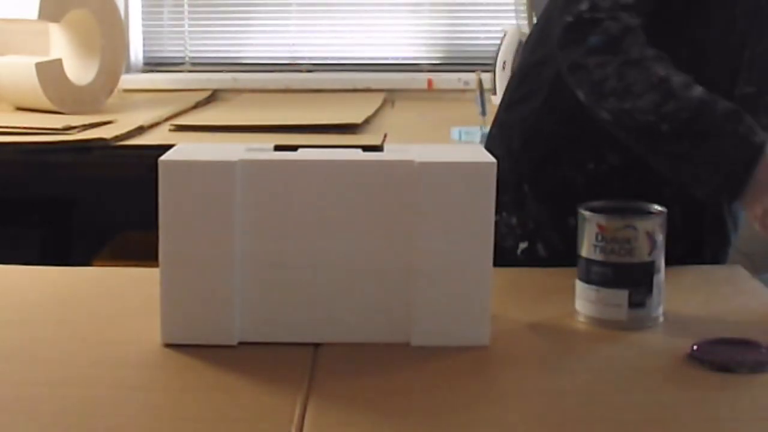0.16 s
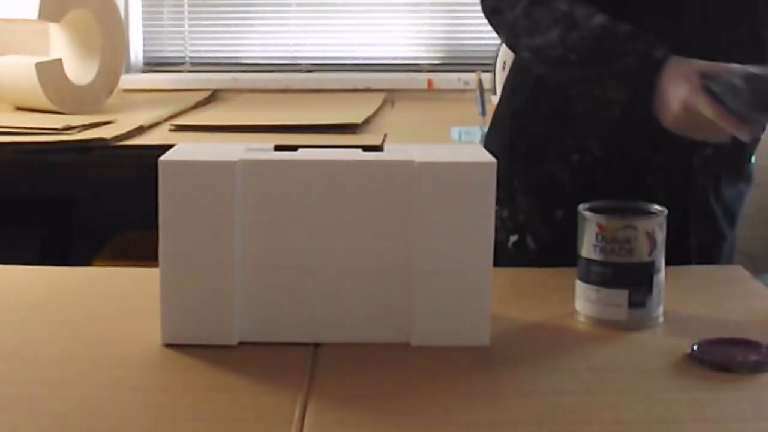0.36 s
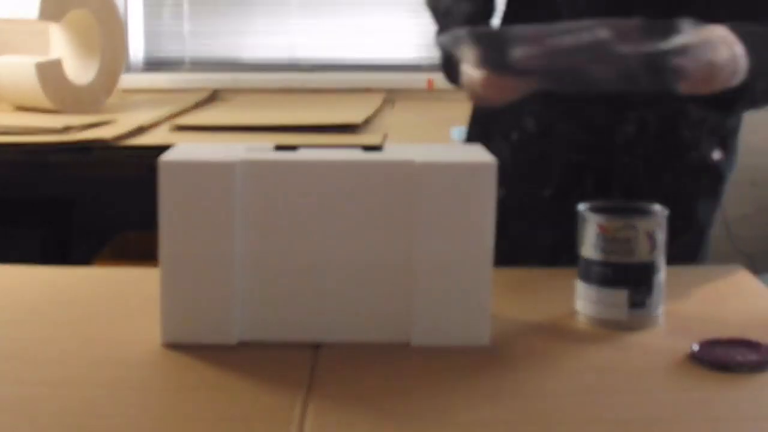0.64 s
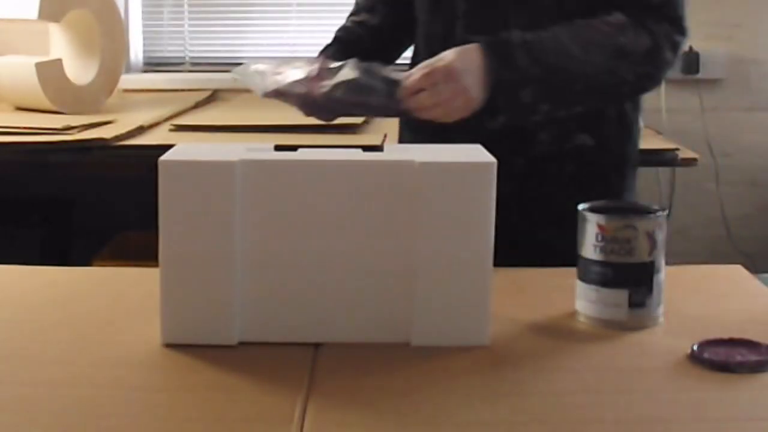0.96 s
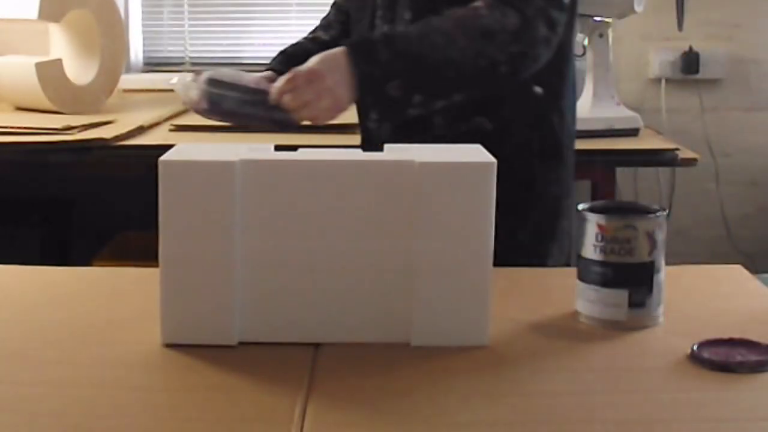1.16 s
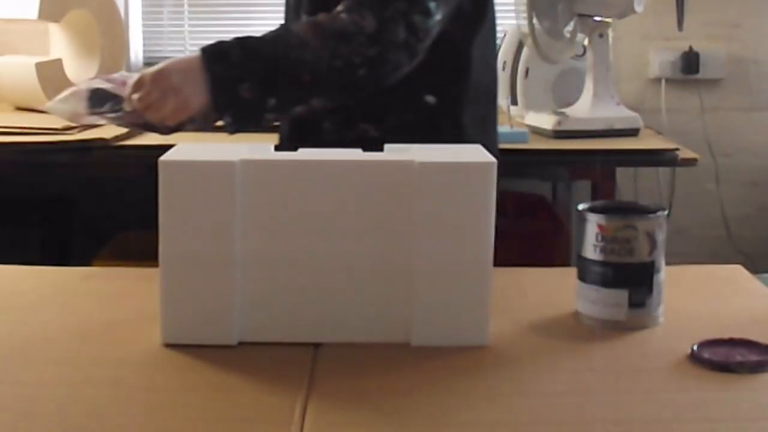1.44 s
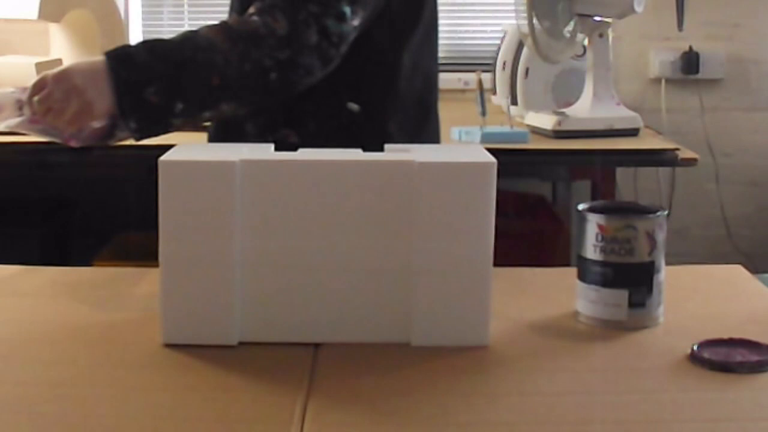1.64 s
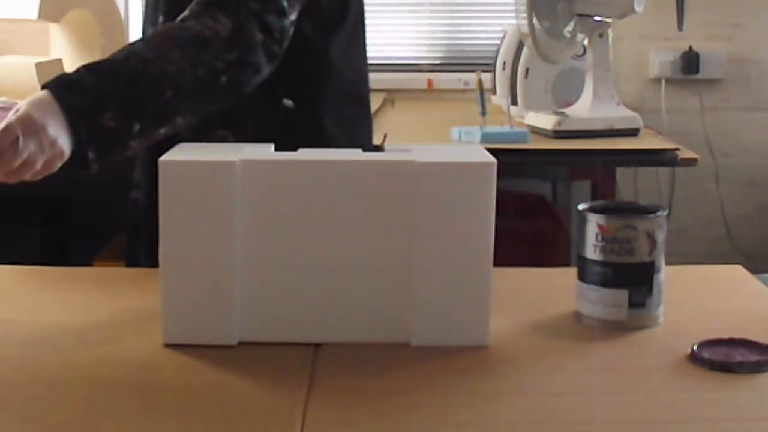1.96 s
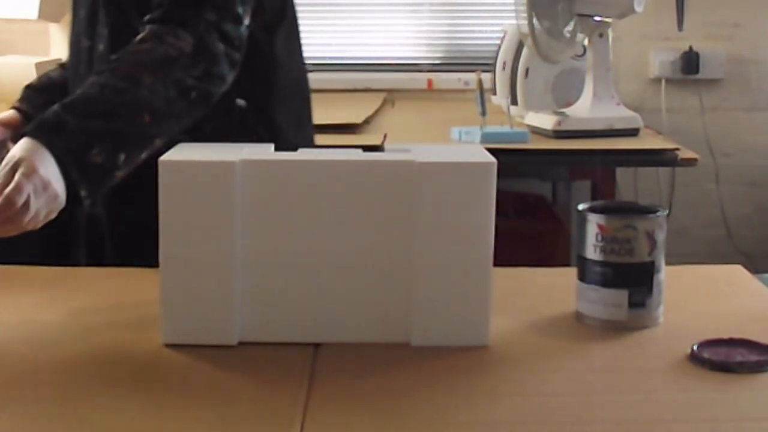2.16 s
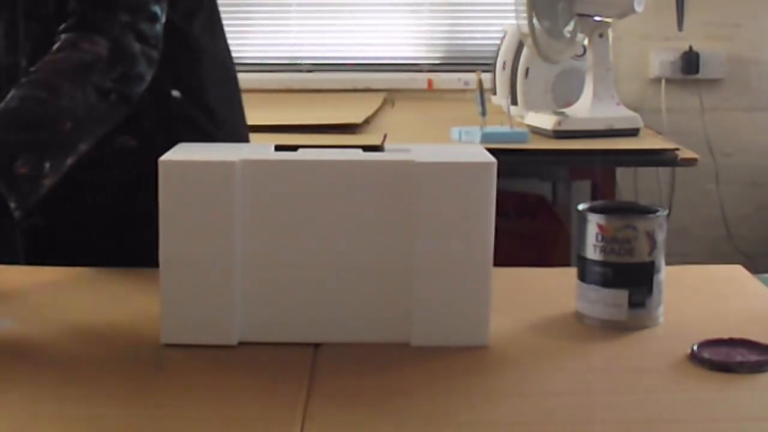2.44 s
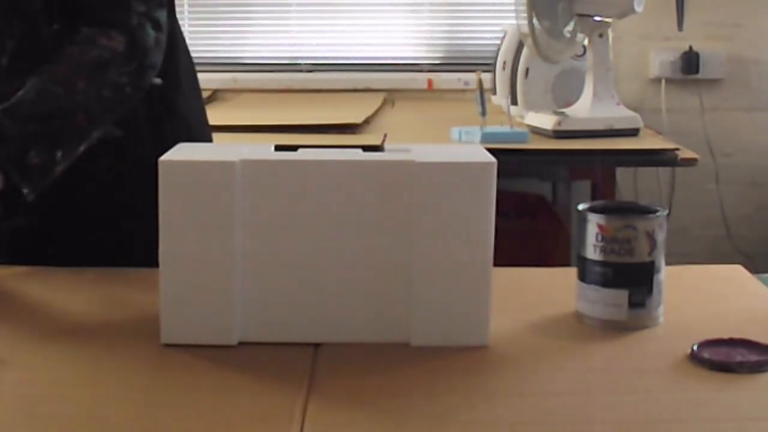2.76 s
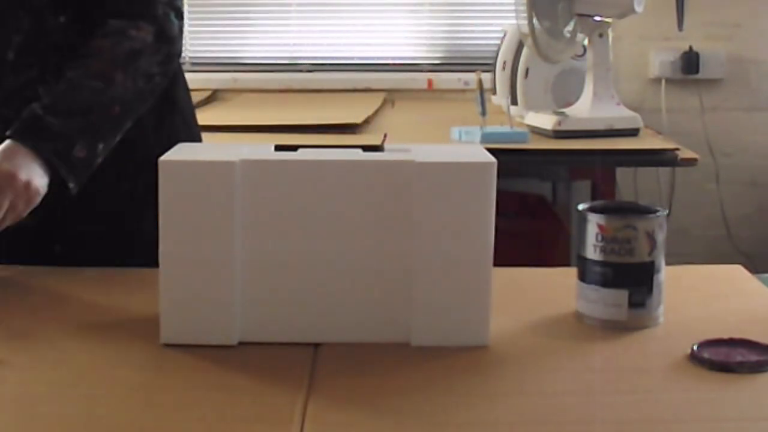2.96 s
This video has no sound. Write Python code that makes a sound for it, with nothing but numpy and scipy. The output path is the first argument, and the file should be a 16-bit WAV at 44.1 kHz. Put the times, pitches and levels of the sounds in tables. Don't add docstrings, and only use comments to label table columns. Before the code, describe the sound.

Thin plastic sleeve being squeezed and moved, popping sharply over a faint low room rumble

```python
import sys
import numpy as np
from scipy import signal
from scipy.fft import rfft, irfft
from scipy.io import wavfile
from scipy.ndimage import uniform_filter1d

SR = 44100
rng = np.random.default_rng(int(sys.argv[2]) if len(sys.argv) > 2 else 0)


def generate_wav(signal):
    frames = np.transpose(np.atleast_2d(signal))
    scaled = np.clip(frames, -1, 1) * 32767
    pcm = np.round(scaled).astype(np.int16)
    wavfile.write(sys.argv[1], SR, pcm)


def to_linear_factor(level_db):
    exponent = np.asarray(level_db, float) / 20
    return 10 ** exponent


N = 136710
T = np.arange(N) / SR

# pitch_hz [Hz], density_db [dB per Hz]
WASH_COLOUR = [(35, -41), (60, -4), (156, -2.5), (1230, -10.5), (3340, -6.5), (5320, -29.5), (10200, -49),
               (13500, -35), (15500, -76)]
# centre_s [s], length_s [s], peak_db [dB]
HEAVES = [(.83, 0.034, -27.5), (.872, 0.042, -19), (.905, 0.04, -28), (.985, 0.038, -23.5),
          (1.1, 0.042, -29.5), (1.445, 0.041, -23.5), (1.49, 0.053, -28), (1.65, 0.045, -28.5),
          (2.015, 0.036, -31), (2.115, 0.059, -28), (2.16, 0.06, -29), (2.26, 0.04, -27.5)]
# time_s [s], crackle_db [dB], treble_tilt_db [dB]
EFFORT = [(0, -58, 16.5), (.195, -54, 2), (0.225, -35, 1), (.64, -30.5, -3), (.71, -40.5, 3.5),
          (.81, -45.5, 3), (.9, -36.5, -4.5), (.935, -23.5, 1.5), (1.1, -28, 0), (1.3, -29, 2),
          (1.35, -31, -0.5), (1.42, -25.5, 1), (1.688, -25, 2), (1.77, -46.5, 0), (2.26, -46, 3),
          (2.42, -38, -1.5), (2.56, -43, 3), (2.8, -37.5, -0.5)]
# centre_s [s], length_s [s], gain_db [dB], body_db [dB]
SQUEEZES = [(0.264, 0.11, 7.5, 2), (0.436, 0.043, 3.5, 5.5), (0.538, 0.066, 4.5, -0.5),
            (0.764, 0.031, 9.5, -7), (0.878, 0.029, 12, -4), (0.959, 0.014, -0.5, 2.5),
            (0.988, 0.038, -7.5, -8), (1.092, .04, -3, 1.5), (1.155, 0.02, 8.5, -1), (1.231, 0.076, 10, 3),
            (1.398, 0.064, 5, 3.5), (1.461, 0.041, 4, -2.5), (1.62, 0.28, 1, 3.5), (1.627, 0.082, 1, -2.5),
            (1.834, 0.052, 13, -20), (1.909, 0.077, 13, 3), (2.195, 0.014, 15.5, 9),
            (2.311, 0.0056, 14, 4.5), (2.348, 0.034, 11, -1), (2.607, 0.016, -7, 8), (2.463, 0.057, 13, 3),
            (2.872, 0.1, 10.5, 0.5), (2.961, 0.012, 10, -12), (3.055, 0.0077, -0.5, 13.5)]
# pitch_hz [Hz], density_db [dB per Hz]
FILM_COLOUR = [(210, -39), (350, -12), (878, -8.5), (1210, -12.5), (1740, -6), (3550, -1), (5800, -14.5),
               (10400, -26), (13500, -37)]
# start_s [s], peak_db [dB], pitch_hz [Hz], treble_db [dB]
SNAPS = [(0.0181, -26.5, 3400, -23), (0.0928, -30, 2880, -20), (0.2036, -30, 2830, -20),
         (0.2219, -31, 3200, -28), (0.3033, -15, 3700, -20), (0.524, -16.5, 3470, -17.5),
         (0.5927, -18.5, 2570, -16), (0.6507, -16.5, 2630, -23), (0.8671, -24.5, 3140, -23),
         (0.9211, -13.5, 2680, -14), (1.0142, -17, 2600, -15), (1.0929, -13, 4050, -18),
         (1.1318, -13.5, 3500, -5), (1.715, -17.5, 3120, -45), (1.8099, -17.5, 3270, -14.5),
         (1.8531, -13, 3580, -16), (1.8912, -18, 3100, -41), (1.985, -25.5, 3060, -11),
         (2.047, -29.5, 3800, -13), (2.0717, -19.5, 3370, -9.5), (2.19, -21, 3230, -13.5),
         (2.2938, -15, 2560, -25), (2.3092, -9.5, 3320, -21), (2.4025, -15, 2770, -19),
         (2.6049, -20.5, 2980, -15), (2.8423, -12.5, 2600, -11), (3.0006, -22, 3670, -10),
         (3.0703, -23, 3420, -12)]
# start_s [s], peak_db [dB], pitch_hz [Hz]
PRICKS = [(0.0209, -43.5, 5880), (0.0626, -42, 7650), (0.1087, -44, 5550), (0.2114, -42, 5780),
          (0.2219, -37, 5600), (0.2399, -24, 5930), (0.3511, -40, 7930), (0.372, -31, 5500),
          (0.377, -32, 6300), (0.5332, -23.5, 5940), (0.7472, -30, 5660), (0.9133, -24, 5660),
          (0.9358, -23, 5700), (0.992, -29, 5500), (1.0146, -26.5, 7020), (1.031, -32, 5500),
          (1.0434, -28, 5600), (1.067, -37, 7860), (1.0919, -38, 5770), (1.1297, -28, 7500),
          (1.2604, -33, 5500), (1.3563, -29, 5520), (1.5244, -27, 6510), (1.8028, -30, 5860),
          (1.9934, -33, 6840), (2.2662, -39, 5990), (2.2897, -29, 6290), (2.3284, -27, 6290),
          (2.4675, -33, 7200), (2.8325, -27, 7540), (2.8654, -26, 7350), (3.0415, -34, 7200)]
# centre_s [s], length_s [s], level_db [dB], pitch_hz [Hz]
GULPS = [(0.107, 0.029, -38, 305), (0.212, 0.029, -36.5, 306), (0.24, 0.027, -44, 305),
         (0.303, 0.022, -35.5, 297), (0.409, 0.038, -36, 302), (0.437, 0.024, -36.5, 282),
         (0.506, 0.024, -36.5, 297), (0.576, 0.025, -34, 297), (0.624, 0.044, -39, 295),
         (1.055, 0.017, -32, 296), (1.164, 0.026, -35.5, 292), (1.25, 0.052, -35, 293),
         (1.373, 0.061, -36.5, 286), (1.622, 0.026, -36.5, 284), (2.259, 0.015, -37, 272)]
# start_s [s], peak_db [dB], pitch_hz [Hz]
CREASES = [(0.2526, -18, 3450), (0.2644, -18, 3430), (0.352, -17, 3240), (0.377, -16.5, 3050),
           (0.3905, -19, 3070), (0.3985, -15, 3130), (0.418, -13.5, 3220), (0.4606, -10, 3130),
           (0.5305, -12, 3440), (0.8144, -31, 2940), (0.9349, -10, 3650), (0.9524, -22, 3280),
           (1.0308, -15, 2710), (1.058, -12.5, 3230), (1.0926, -18, 3480), (1.1721, -12, 3520),
           (1.2053, -11, 3280), (1.2264, -4, 3140), (1.2304, -16, 2900), (1.2502, -9, 3560),
           (1.3876, -11, 3430), (1.458, -9, 2920), (1.4627, -13.5, 3330), (1.511, -18, 3170),
           (1.5225, -12, 2780), (1.595, -14, 3120), (1.601, -17, 2770), (1.6187, -17, 3600),
           (1.674, -12, 3440), (1.7216, -12, 3180), (1.949, -23, 3380), (2.2702, -26, 2760),
           (2.3288, -18, 3320), (2.3471, -14.5, 3630), (2.3642, -15.5, 3400), (2.4564, -19, 3200),
           (2.4667, -12, 3220), (2.7292, -25, 3330), (2.8465, -12, 2720), (2.8845, -12, 3550),
           (2.8964, -13, 3600), (2.9626, -15.5, 3400)]
# centre_s [s], length_s [s], level_db [dB], top_hz [Hz]
SHOVES = [(0.747, 0.058, -40.5, 119), (1.252, 0.19, -40, 300), (1.433, 0.23, -43.5, 120),
          (1.384, 0.045, -34.5, 1010), (2.03, 0.036, -41.5, 255), (2.076, 0.14, -39.5, 89),
          (2.109, 0.04, -36, 378), (2.187, 0.15, -40, 596), (2.28, 0.068, -38.5, 407),
          (2.423, 0.12, -42.5, 147), (2.472, 0.022, -33.5, 1030)]
# start_s [s], length_s [s], level_db [dB], pitch_hz [Hz]
RINGS = [
    (1.37, .035, -36, 1780),
    (1.41, .07, -38, 1795),
    (1.375, .03, -43, 880),
]


def level(x, db):
    return x * to_linear_factor(db) / np.sqrt(np.mean(x ** 2))


def colour(x, points):
    point_hz, point_db = np.array(points, float).T
    hz = np.maximum(np.arange(1025) * SR / 2048, 1)
    gain_db = np.maximum(np.interp(np.log(hz), np.log(point_hz), point_db), -90)
    cepstrum = irfft(gain_db * np.log(10) / 20)
    cepstrum[1:1024] *= 2
    cepstrum[1025:] = 0
    impulse = irfft(np.exp(rfft(cepstrum)))
    return signal.fftconvolve(x, impulse)[:len(x)]


def band(x, hz, width_hz):
    return signal.lfilter(*signal.iirpeak(hz, hz / width_hz, SR), x)


def cut(x, hz, kind, order=2):
    return signal.sosfilt(signal.butter(order, hz, kind, fs=SR, output="sos"), x)


def walk(rate_hz):
    hold = int(SR / rate_hz)
    steps = np.repeat(rng.standard_normal(N // 20)[:N // hold + 1], hold)
    return 1.3 * uniform_filter1d(uniform_filter1d(steps, hold), hold)[:N]


def bump(centre_s, length_s):
    return np.cos(np.pi * np.clip((T - centre_s) / length_s, -0.5, 0.5)) ** 2


def floor_rumble():
    centre_hz = 28
    sway = band(band(rng.standard_normal(N), centre_hz, 6.8), centre_hz, 15)
    sway = cut(sway, 72, "low", order=3)
    return sway / np.sqrt(uniform_filter1d(sway ** 2, size=9000)) * to_linear_factor(-42.5)


def mains_hum():
    return np.sin(2 * np.pi * 101.7 * T) * to_linear_factor(-52.5 + 2.0 * walk(6.17))


def floor_heaves():
    heaves = 0
    for k, (centre_s, length_s, peak_db) in enumerate(HEAVES):
        heaves = heaves + (-1) ** k * to_linear_factor(peak_db) * bump(centre_s, 0.89 * length_s)
    return cut(heaves, 3.2, "high", order=1)


def shop_wash():
    wash = level(colour(rng.standard_normal(N), WASH_COLOUR), -43.5) * to_linear_factor(1.4 * walk(5.65))
    return wash + 0.57 * band(wash, 2890, 270) + 0.54 * band(wash, 1465, 167)


def pops(rate_hz, scatter_db):
    smear_s = 0.00074
    chance, size = rng.random((2, N))
    clicks = (chance < rate_hz / SR) * to_linear_factor(-2 * scatter_db * np.log(size + 0.01))
    power = signal.lfilter([1], [1, -np.exp(-2 / (smear_s * SR))], clicks)
    return level(np.sqrt(power) * rng.standard_normal(N), 0)


def crackle():
    pops_per_s = 3200
    time_s, crackle_db, tilt_db = np.array(EFFORT).T
    clusters_db = 1.2 * walk(59.65) + 0.98 * walk(24.34)
    squeeze_db = sum(gain_db * bump(c, 2 * w) for c, w, gain_db, _ in SQUEEZES)
    loudness_db = np.interp(T, time_s, crackle_db) + clusters_db + squeeze_db
    film = 0
    for hz in (1515, 2600, 4430, 7600):
        creases = pops(pops_per_s / 4, scatter_db=1)
        film = film + 0.56 * creases + band(creases, hz, hz * 0.27)
    film = colour(film, FILM_COLOUR)
    film = level(film + 0.82 * band(film, 3280, 540), -1.48) * to_linear_factor(loudness_db)
    treble_db = np.interp(T, time_s, tilt_db) + 1.4 * walk(45.27)
    return film + cut(film, 2650, "high") * (to_linear_factor(treble_db) - 1)


def snaps():
    n, decay_s, crack_s, rise_s = 4096, 0.005, 0.001, 0.0016
    out = np.zeros(N + n)
    train = pops(3600, scatter_db=1.2)
    fade = np.exp(-T[:n] / decay_s)
    for k, (start_s, peak_db, hz, treble_db) in enumerate(SNAPS):
        run = train[k * n:k * n + n] * fade
        run[:256] += 1.1 * rng.standard_normal(256) * np.exp(-T[:256] / crack_s)
        run *= 1 - np.exp(-T[:n] / rise_s)
        run = colour(0.5 * run + 1.66 * band(run, hz, 660), FILM_COLOUR)
        run = run + cut(run, 4800, "high") * (to_linear_factor(treble_db + 18.5) - 1)
        i = int((start_s - 0.001) * SR)
        out[i:i + n] += run / np.sqrt(np.mean(run[:256] ** 2)) * to_linear_factor(peak_db - 8.5)
    return out[:N]


def ticks(table, decay_s, width_share, trim_db):
    n, rise_s = 512, 0.00043
    out = np.zeros(N + n)
    fade = np.exp(-T[:n] / decay_s)
    rise = 1 - np.exp(-T[:n] / rise_s)
    for start_s, peak_db, hz in table:
        rasp = rng.standard_normal(n) * fade * rise
        rasp = band(band(rasp, hz, hz * width_share), hz, hz * 0.45)
        i = int(start_s * SR)
        out[i:i + n] += rasp / np.max(np.abs(rasp)) * to_linear_factor(peak_db + trim_db)
    return out[:N]


def edge_pricks():
    return ticks(PRICKS, decay_s=0.0021, width_share=0.45, trim_db=-0.5)


def tin_gulps():
    gulps = 0
    for centre_s, length_s, level_db, hz in GULPS:
        tone = np.sin(2 * np.pi * hz * (T - centre_s))
        gulps = gulps + to_linear_factor(level_db + 3.5) * bump(centre_s, length_s) ** 0.77 * tone
    return gulps


def sharp_creases():
    return ticks(CREASES, decay_s=0.0015, width_share=0.16, trim_db=-5.0)


def squeeze_body(film):
    body_db = sum(body * bump(c, 2 * w) for c, w, _, body in SQUEEZES)
    return film + cut(film, 2030, "low") * (to_linear_factor(body_db) - 1)


def shoves():
    out = 0
    for centre_s, length_s, level_db, top_hz in SHOVES:
        push = cut(cut(rng.standard_normal(N), top_hz, "low"), 28, "high")
        out = out + bump(centre_s, 1.83 * length_s) * level(push, level_db)
    return out


def tin_rings():
    flutter = band(rng.standard_normal(N), 43, 73) * 11 + 1.9
    rings = 0
    for start_s, length_s, level_db, hz in RINGS:
        tone = np.sin(2 * np.pi * hz * (T - start_s))
        rings = rings + to_linear_factor(level_db) * bump(start_s + length_s / 2, length_s) ** 0.13 * tone
    return rings * flutter


def room(x):
    t60_s = 0.4
    t = T[:SR // 2]

    def fall(time_s):
        return np.exp(-np.log(1000) * t / time_s) * np.minimum(t / 0.01, 1)

    out = 0
    for k in range(4):
        noise = rng.standard_normal(len(t))
        tail = cut(noise, 3900, "low") * fall(t60_s) + 1.34 * cut(noise, 6640, "high") * fall(t60_s * 0.63)
        share = np.maximum(np.cos(2 * np.pi * (3 * T - k / 4)), 0)
        out = out + signal.fftconvolve(x * share, tail / np.sqrt(np.sum(tail ** 2)))[:N]
    return out * to_linear_factor(-4)


def scene():
    port_lag, diffuse_db = 0.88, 4.5
    near = squeeze_body(crackle() + snaps()) + sharp_creases() + edge_pricks()
    lows = floor_rumble() + floor_heaves() + mains_hum()
    wash, wash_around = shop_wash(), shop_wash()
    mid = near + room(near) + tin_gulps() + tin_rings() + shoves() + lows + wash
    around = cut(room(near) * 2.4 + wash_around, 8800, "high", order=1)
    across = port_lag * mid + to_linear_factor(diffuse_db) * around
    side = -np.gradient(across) / 2
    side_lows = cut(cut(side, 420, "low", order=1)[::-1], 420, "low", order=1)[::-1]
    side = side - side_lows
    return np.array([mid + side, mid - side])


def low_pass(x):
    return signal.sosfilt(signal.butter(12, 15740, fs=SR, output="sos"), x)


def record(dry):
    dry = signal.sosfilt(signal.ellip(10, 0.2, 70, 15550, fs=SR, output="sos"), dry)
    dry = np.array([cut(port, 14500, "low", order=8) for port in dry])
    return low_pass(dry)


dry = scene()
out = record(dry)
generate_wav(out)
```